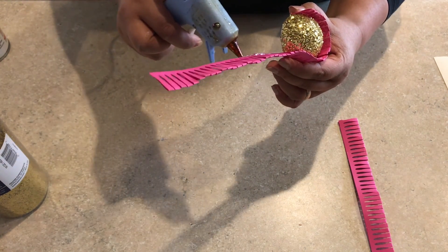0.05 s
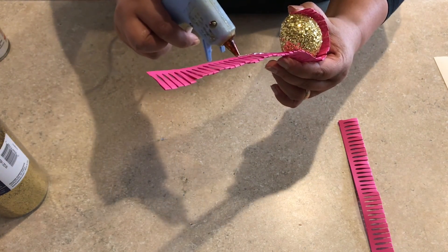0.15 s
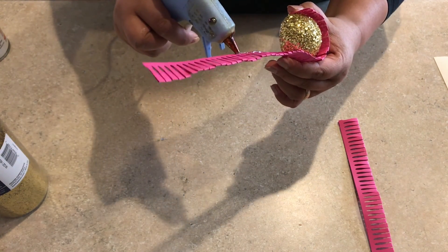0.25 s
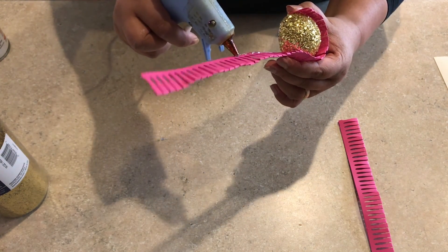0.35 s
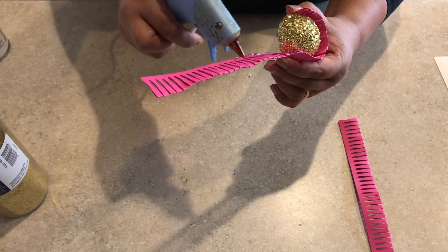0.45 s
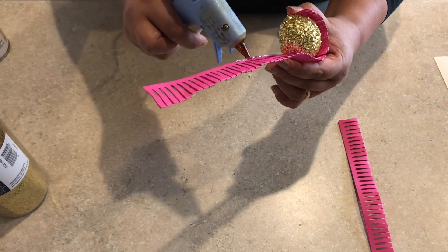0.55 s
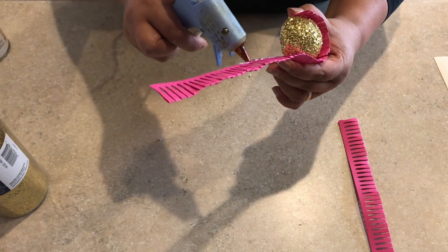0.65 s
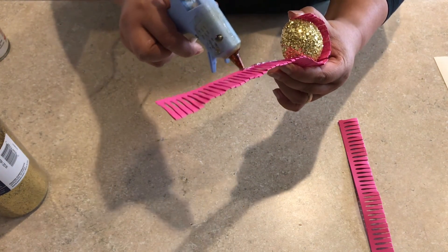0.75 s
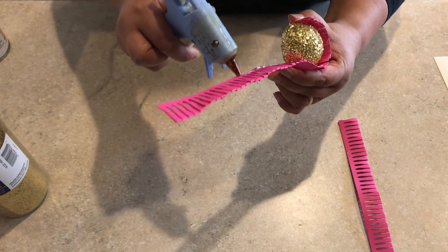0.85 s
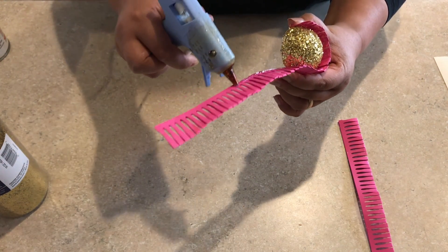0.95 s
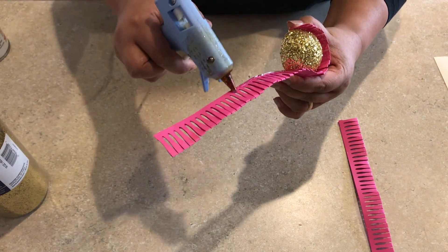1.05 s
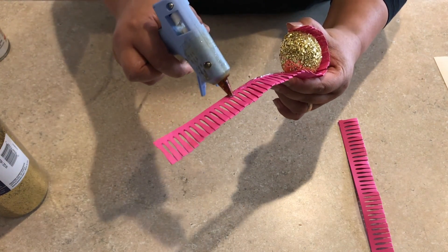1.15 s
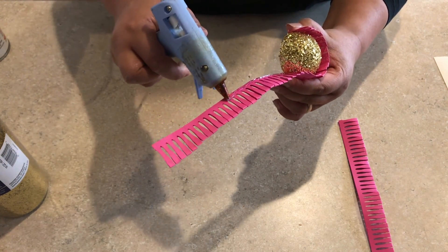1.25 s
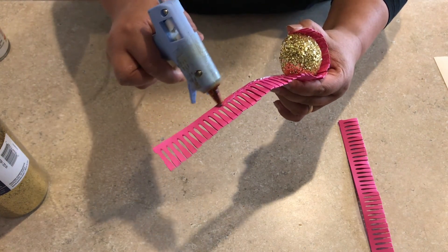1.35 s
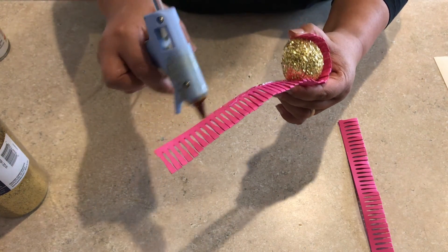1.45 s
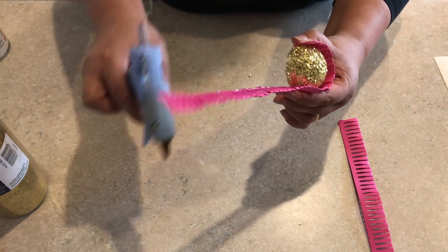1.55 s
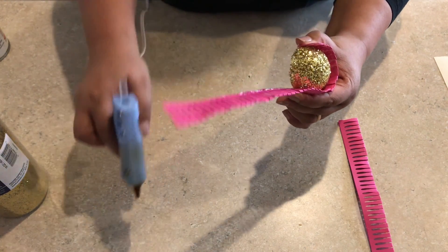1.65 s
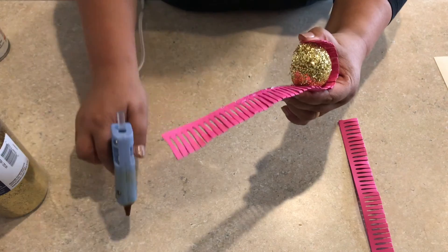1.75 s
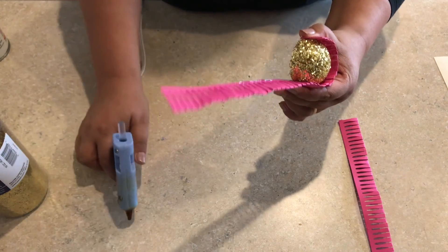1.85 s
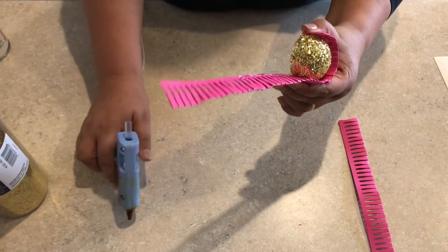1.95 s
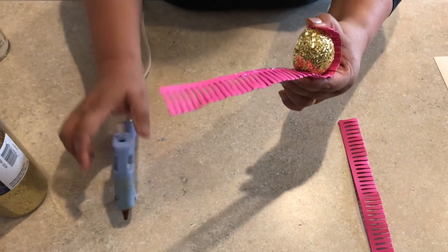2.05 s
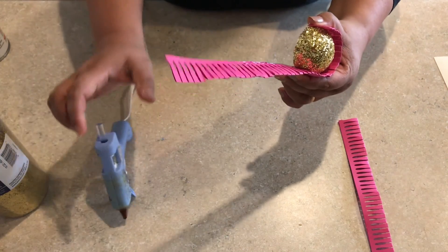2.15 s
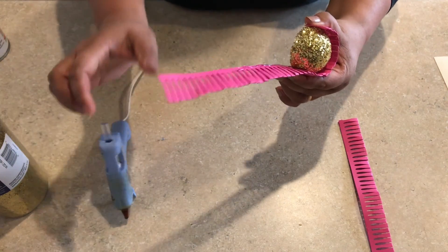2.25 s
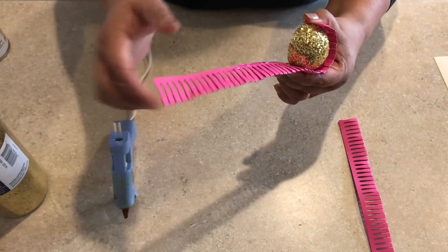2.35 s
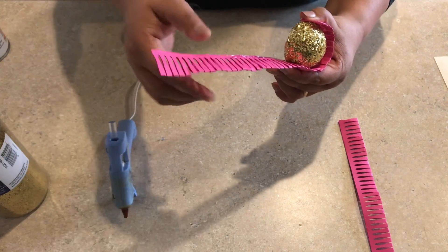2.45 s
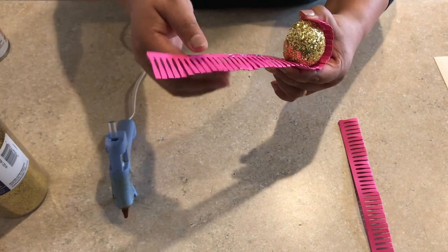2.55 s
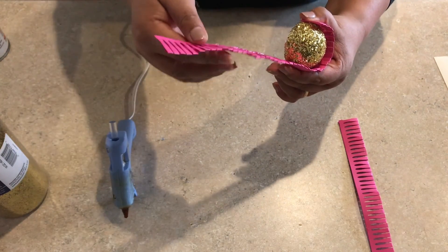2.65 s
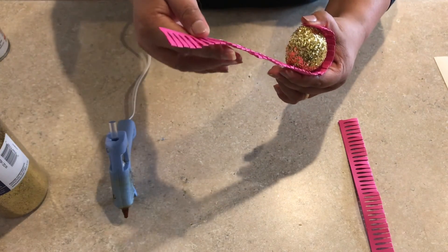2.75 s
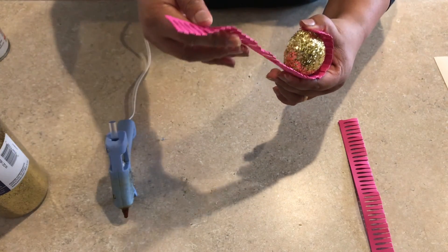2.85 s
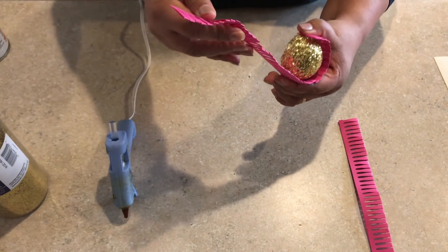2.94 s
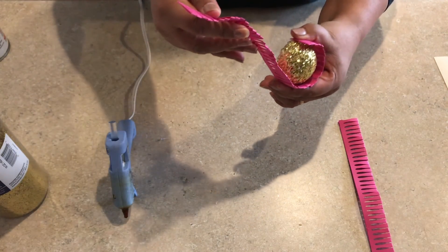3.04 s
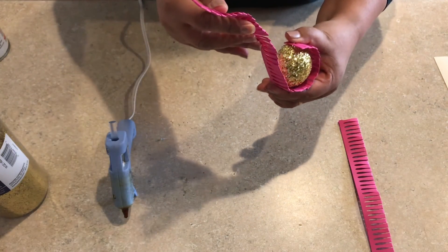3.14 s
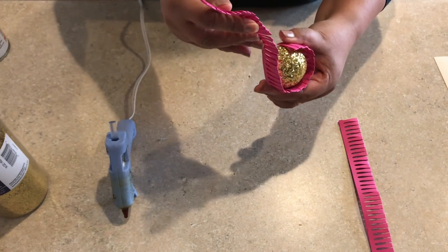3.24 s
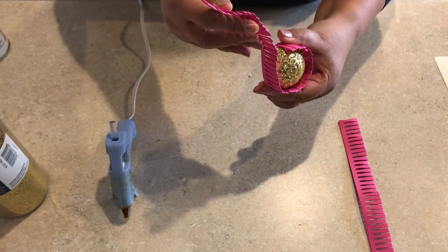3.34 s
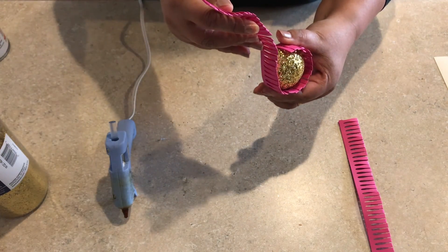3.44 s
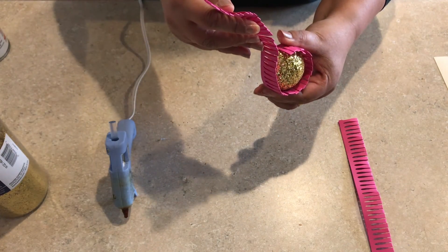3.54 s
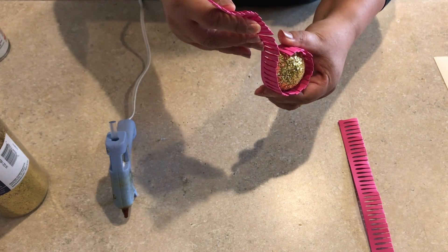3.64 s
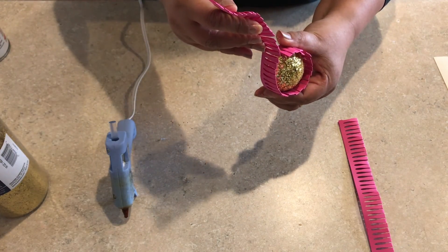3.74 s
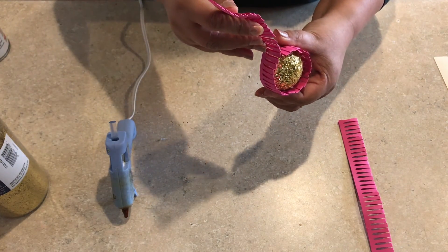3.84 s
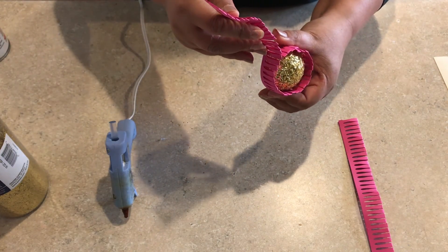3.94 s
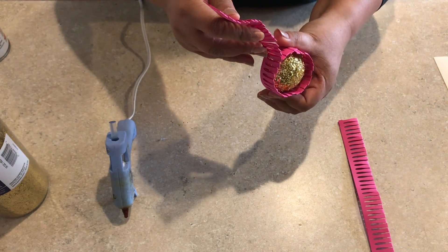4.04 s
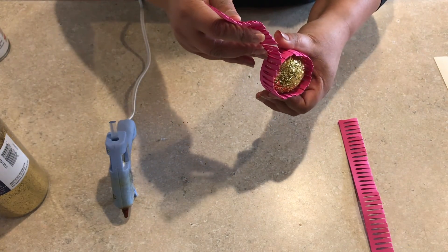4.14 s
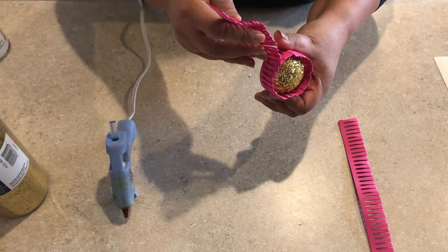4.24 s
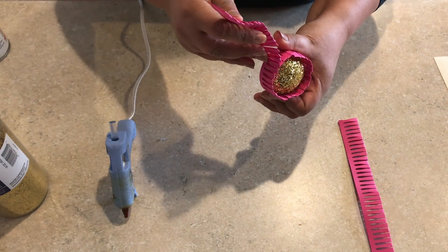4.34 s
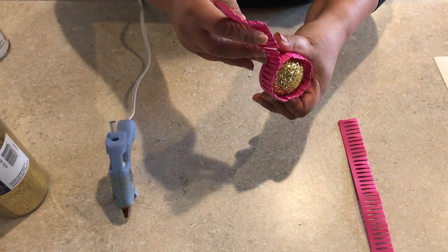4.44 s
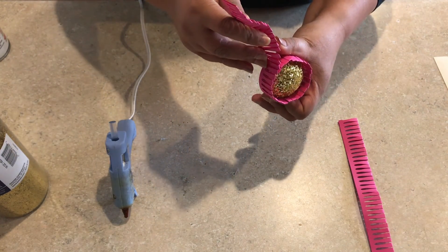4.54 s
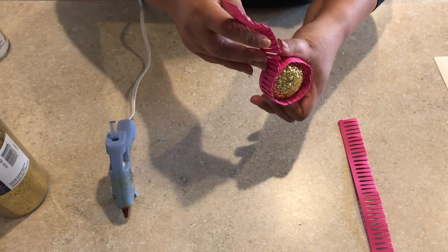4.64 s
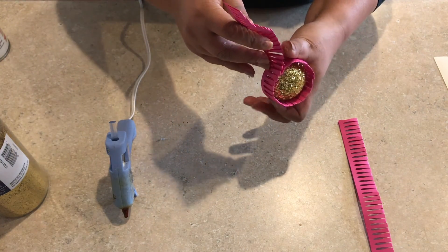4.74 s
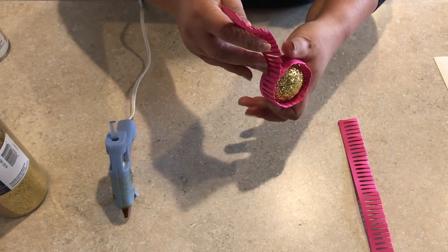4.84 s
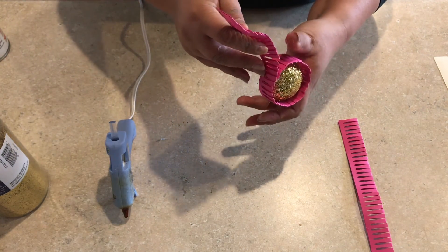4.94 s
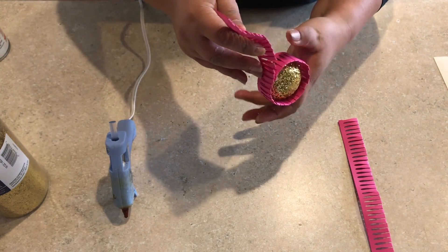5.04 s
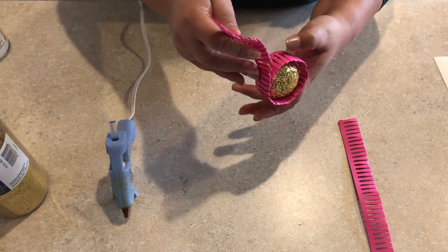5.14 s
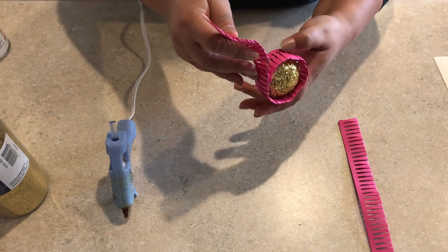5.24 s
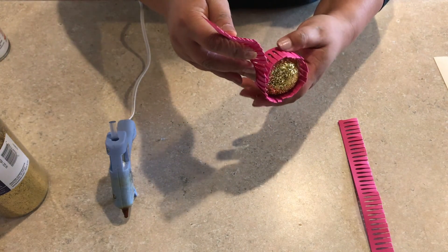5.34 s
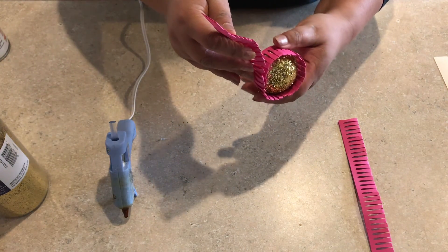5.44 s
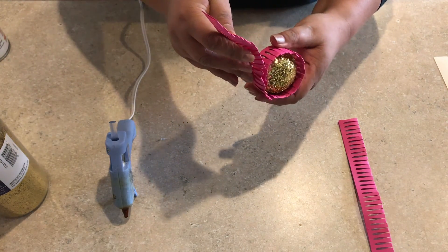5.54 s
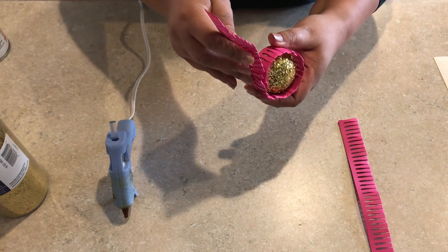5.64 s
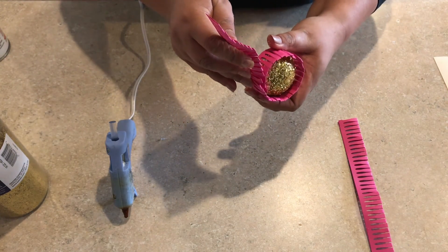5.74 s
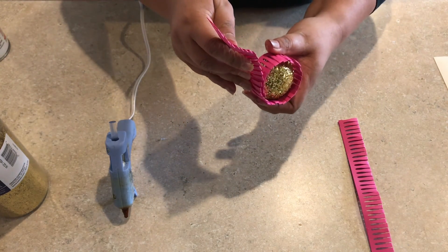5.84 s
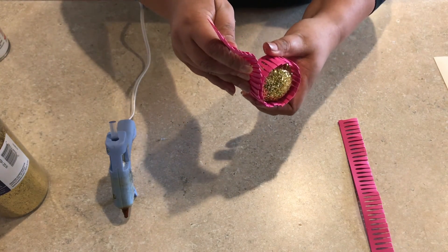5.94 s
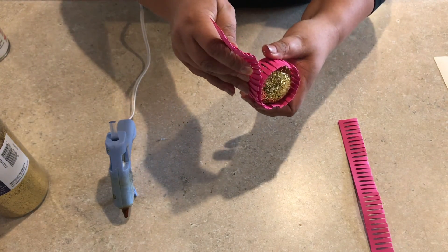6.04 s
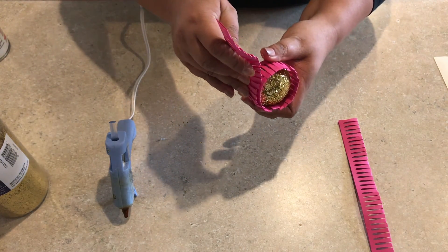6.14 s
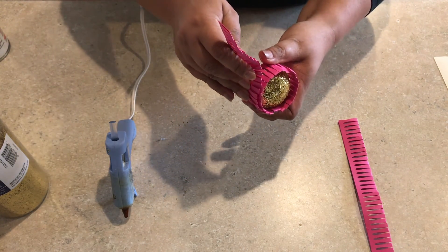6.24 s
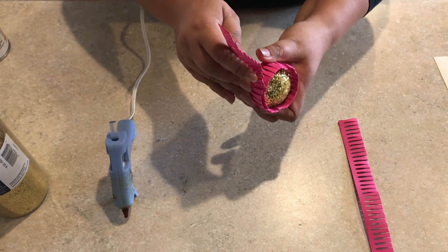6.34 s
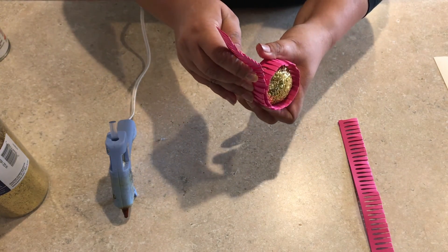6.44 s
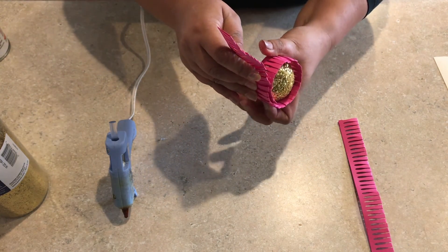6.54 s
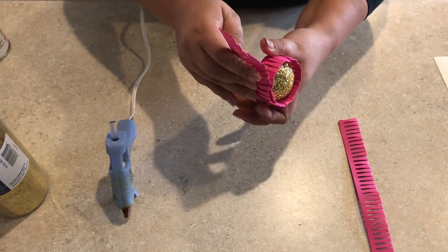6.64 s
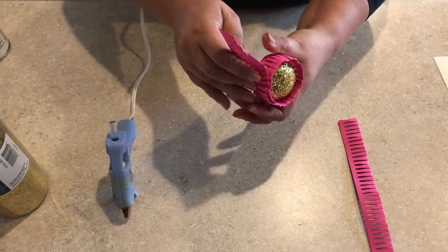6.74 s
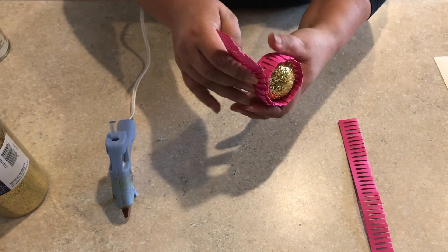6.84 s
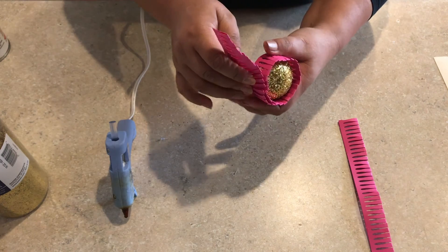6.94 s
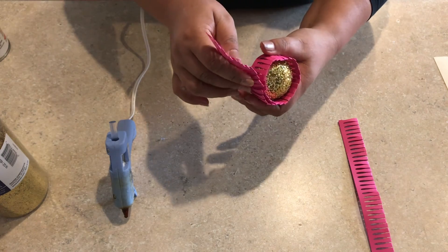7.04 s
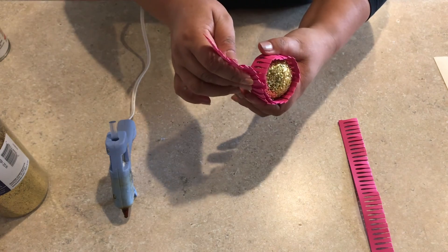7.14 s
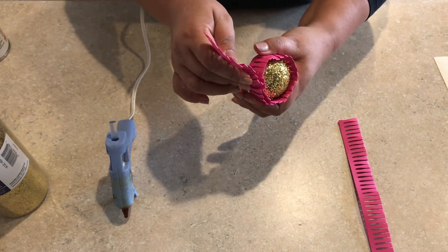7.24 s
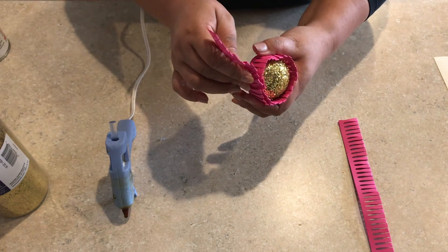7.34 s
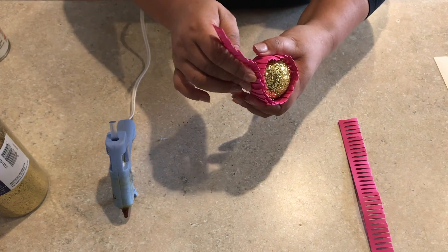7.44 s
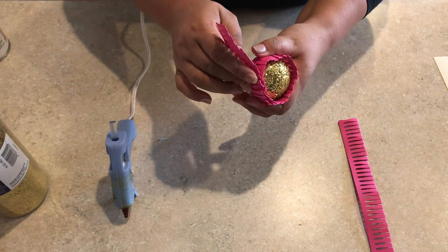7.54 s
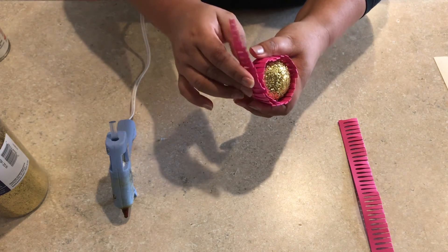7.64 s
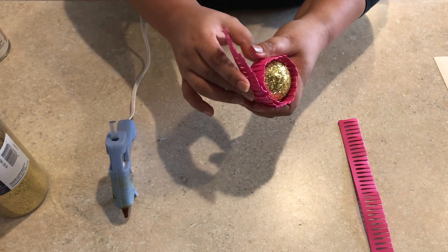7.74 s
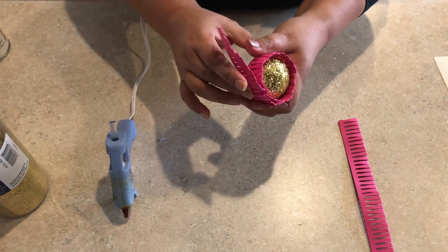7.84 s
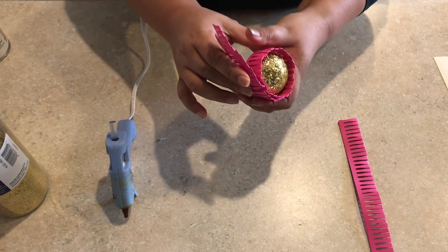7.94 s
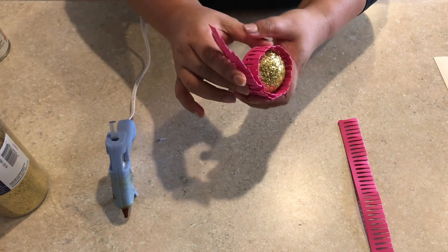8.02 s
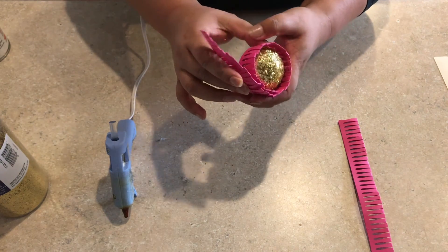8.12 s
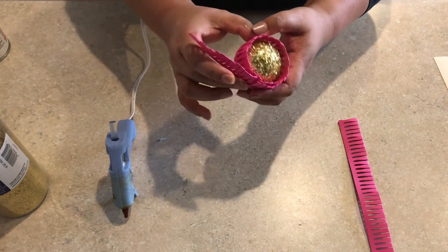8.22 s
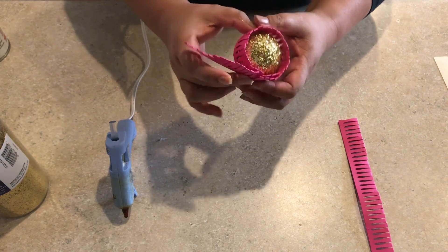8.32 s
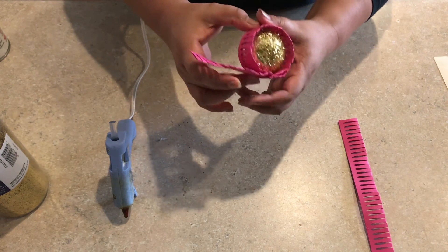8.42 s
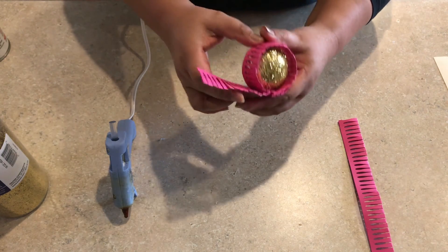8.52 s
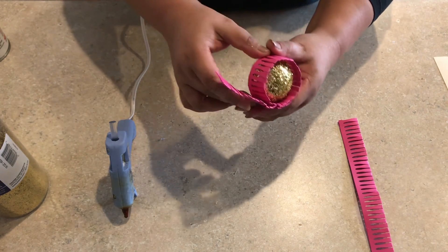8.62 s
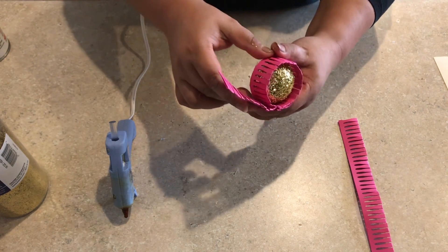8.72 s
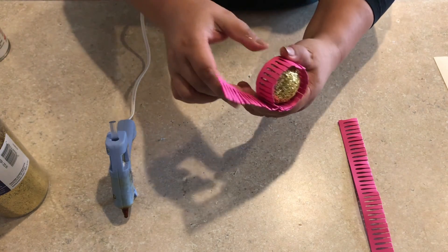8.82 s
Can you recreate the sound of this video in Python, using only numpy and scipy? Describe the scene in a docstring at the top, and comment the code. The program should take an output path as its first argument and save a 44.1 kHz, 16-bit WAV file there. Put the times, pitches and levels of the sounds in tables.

```python
"""In a quiet, hard-walled room lie a low rumble (filtered noise) and the regular swish of a distant appliance.
A small glue gun ticks as its stick slips (coloured bursts); it knocks and clicks faintly in handling, then lands
on a countertop and rocks to rest (decaying modes, cracks and chatter). A fringed strip of stiff paper is glued
and wound round a ball close by: it rubs (dense grains), crinkles and snaps (bursts that ring narrow resonances),
taps the ball dully and hisses while it is drawn tight (filtered noise)."""
import sys
import numpy as np
from scipy import signal
from scipy.fft import rfft, irfft, next_fast_len
from scipy.io import wavfile
from scipy.ndimage import uniform_filter1d

SR = 44100
rng = np.random.default_rng(int(sys.argv[2]) if len(sys.argv) > 2 else 0)


def wrap_up_sound(samples):
    """Save the sound to the file named by the first command line argument, as 16-bit audio."""
    columns = np.atleast_2d(samples).T
    # keep every value between -1 and 1, then stretch to whole-number steps
    tamed = np.clip(columns, -1, 1)
    steps = np.round(tamed * 32767).astype(np.int16)
    wavfile.write(sys.argv[1], SR, steps)


N = 391608  # length in samples
TOP_HZ = 16000  # upper limit of the sound's band
SWISH_S, TURN_S = 1.185, 1.299  # the appliance: first full swish, time of one turn
CREEP_END_S = 1.1  # the trigger is let go and the glue stick stops creeping
SPOT_DB, SPOT_DETUNE = 2, .006  # spread of mode level (dB) and pitch (share) with the point of contact
RING_CARRY_DB = -8  # narrow rings are heard close by and carry little into the room

# Spectrum of the room's background: hz, level_db
ROOM_TONE_SPECTRUM = [(20, -19), (40, -5), (80, 1), (108, -5.5), (135, -2.5), (270, -12.5), (340, -8.5),
                      (520, -20), (1100, -18), (1300, -21), (1580, -21), (2200, -28.5), (4000, -32.5),
                      (7500, -37), (16000, -38.5)]
# Reverberation time of the room: hz, t60_s
ROOM_DECAY = [(100, 0.47), (340, 0.58), (700, .48), (1500, 0.44), (3000, 0.29), (7000, 0.3), (16000, 0.15)]
# Spectrum of the room's echo: hz, level_db
ECHO_SPECTRUM = [(80, -12), (300, 0), (1200, -4.5), (2500, -1.5), (6000, -5.5), (16000, -6.5)]
# Slips of the glue stick: start_s, level_db (before the common gain)
STICK_SLIPS = [(0.0265, -47), (0.0896, -49), (0.1131, -52), (0.1274, -61), (0.192, -52), (0.2384, -52),
               (0.3067, -63), (0.3147, -50.5), (0.4584, -45), (0.4622, -42), (0.4984, -56), (0.5065, -45),
               (0.5422, -52), (0.5921, -52), (0.6115, -59), (0.6323, -51), (0.6634, -53), (0.754, -50),
               (0.7588, -40.5), (0.8088, -53), (0.816, -45.5), (0.863, -61.5), (0.9048, -47), (0.9283, -52),
               (0.9632, -59), (0.9986, -57), (1.0745, -57), (1.2326, -52.5), (1.348, -52), (1.3948, -52),
               (1.4015, -52), (1.4217, -47)]
# Spectrum of a slip: hz, level_db
SLIP_SPECTRUM = [(800, -31), (2500, 7.5), (4500, 4), (6100, 11.5), (7500, 3), (13000, 4.5), (16000, -13)]
# Knocks of the gun, in the hand, then on the counter: start_s, level_db, contact_cutoff_hz,
# thump_db, slap_db, chatter_db, boom_db (the last four relative to the knock)
GUN_KNOCKS = [(0.8723, -27.5, 1590, -8, -38, 6.5, -43), (1.9532, 3.5, 6800, 2.5, -16.5, -8, -47),
              (1.9592, -15.5, 3514, -18, -28, 16.5, -43), (2.157, -29.5, 2500, 7, -37, 11.5, -11.5),
              (2.2165, -15.5, 1520, 8, -45, 3, -41), (2.405, -24.5, 3320, 16.5, -39, 6, -23),
              (2.411, -23, 2600, 9, -34, -10, -35), (2.421, -17, 1090, -14, -38, 0, -28),
              (2.462, -27, 1200, 4, -35, 7.5, -25), (2.537, -34, 1070, 16.5, -33, -17, -23),
              (2.594, -26, 1590, 9, -42, 0.5, -26), (2.655, -45, 700, 18.5, -27.5, -10.5, -15),
              (2.688, -39.5, 1500, 16.5, -33, 1, -28), (2.695, -41.5, 2000, 4, -32, -1, -33),
              (2.734, -46, 600, 16.5, -28, -3, -19), (2.757, -43, 1217, 15.5, -35, -2, -22),
              (2.811, -41, 900, 4.5, -29.5, 11, -38)]
# Modes of gun and counter, before the shift by the point of contact: pitch_hz, level_db, t60_s
GUN_COUNTER_MODES = [(87.5, -11.5, 0.087), (133, -7, 0.086), (165, -4.5, 0.12), (200, -1.5, 0.057),
                     (250, -1, 0.056), (333, 1.5, 0.065), (462, -6.5, 0.12), (643, -1.5, 0.059),
                     (790, -8.5, 0.03), (893, 0.5, 0.065), (1086.7, -10.5, .04), (1328, -0.5, 0.043),
                     (1630, -3.5, 0.016), (1609, -2.5, 0.035), (1806, -4, 0.051), (1960, -2, 0.029),
                     (2110, -4.5, 0.027), (2420, -8, 0.044), (3776, -1.5, 0.019), (6400, -17.5, 0.015)]
# Spectrum of the crack of the plastic shell: hz, level_db
CRACK_SPECTRUM = [(50, -20.5), (200, -16), (650, -0.5), (1100, 8), (1500, -13), (2100, 2.5), (3000, -2),
                  (4800, -7.5), (7000, -5.5), (9000, -11), (16000, 6.5)]
# Spectrum of loose parts chattering inside the shell: hz, level_db
CHATTER_SPECTRUM = [(100, -6.5), (330, -3.5), (600, 10), (1000, 9), (1500, 7), (2100, 5), (3000, -3.5),
                    (6000, -8), (16000, -14)]
# The two low resonances woken by the knocks: pitch_hz, level_db, t60_s
LOW_RESONANCES = [(327.5, -1, 0.65), (348, -0.5, 0.42)]
# Rubs of paper on paper and skin: start_s, length_s, level_db, rasp_centre_hz
PAPER_RUBS = [(1.374, 0.4, -79, 5040), (2.123, 0.041, -71, 6500), (2.69, 0.063, -72, 13200),
              (4.768, 0.12, -59.5, 6300), (4.892, 0.068, -64.5, 6000), (6.375, 0.073, -73, 7400),
              (6.585, 0.059, -72.5, 4800), (6.823, 0.086, -72.5, 5500), (6.974, 0.041, -72, 6000),
              (7.047, 0.15, -74, 4880), (7.571, 0.11, -72, 3180), (7.765, 0.053, -73, 8450),
              (7.915, 0.023, -68.5, 4750), (8.25, 0.085, -72.5, 13040), (8.45, 0.05, -71, 6100),
              (8.686, 0.049, -64.5, 5360), (8.715, 0.076, -75, 6000), (8.862, 0.028, -68, 5070)]
# Spectrum of paper fibres that catch and slip: hz, level_db
FIBRE_SPECTRUM = [(600, -24), (1600, -5.5), (3000, 0), (6200, -3.5), (9000, 0.5), (13500, -3), (16000, -8)]
# Spells of faint clicks and crinkles, handling of the gun, then the bending strip:
# start_s, length_s, level_db, body_db, edge_db (levels before the scatter and the common gains)
CLICK_CRINKLE_SPELLS = [(1.504, 0.23, -58, -14, -32), (5.972, 0.2, -59, -14, -15),
                        (6.597, 0.089, -63, -24.5, -2.5), (7.595, 0.12, -65, -17, -12),
                        (8.25, 0.091, -63.5, -19, -7.5), (8.7, 0.12, -68, -19, -12)]
# Snaps of single tabs, and before them faint clicks of the gun being handled:
# start_s, level_db, body_db, edge_db, ring_hz, ring_db (level, body and edge before the common gains)
CLICKS_AND_SNAPS = [(1.56, -52, -9, -31, 4730, 5.5), (1.581, -54.5, -2.5, -31, 2520, 1.5),
                    (1.686, -42, -17, -36, 4430, -12), (1.74, -57, -8.5, -21, 1470, 11),
                    (1.746, -64.5, 1, -24, 1370, 16), (1.7809, -30.5, -32.5, -6, 8200, -5),
                    (1.8735, -37, -24, -37, 5530, -16), (3.2603, -33.5, -11, -15.5, 4470, -1),
                    (3.5563, -45.5, -17.5, -1.5, 7100, -6), (3.563, -41, -23, 0.5, 6850, -7.5),
                    (3.5872, -33, -22.5, -9, 6720, -12), (3.6171, -32.5, -21.5, -5.5, 6720, -11),
                    (3.6714, -30.5, -25, -9, 8900, 0), (3.709, -32, -13.5, -5.5, 4360, -8),
                    (3.882, -51.5, -24, -1, 8860, -2), (4.122, -41, -23, -10, 9130, -12),
                    (4.1827, -28.5, -27.5, -7.5, 3900, 4), (4.404, -36, -20.5, -9, 6560, -11),
                    (4.7501, -28, -19, -18, 1500, 1.5), (4.786, -43, -17, -11, 3900, 1),
                    (4.7985, -33.5, -16.5, -9, 2200, 2), (4.932, -38, -27.5, -11.5, 6540, -18),
                    (5.1456, -54.5, -28.5, -9, 8000, -5), (5.439, -40, -25, -21, 8250, -7.5),
                    (5.518, -42.5, -27.5, -12.5, 6230, -10), (5.5721, -46, -19, -8, 9000, -4.5),
                    (5.737, -52.5, -16, -14.5, 4190, 7.5), (5.9466, -38.5, -30.5, 1.5, 8830, 6.5),
                    (5.995, -52.5, -14, -6, 2940, 4.5), (6.08, -57, -17, -21, 2810, 17),
                    (6.116, -40.5, -24, -8.5, 3160, 9.5), (6.1557, -46.5, -40, -14.5, 4500, 4),
                    (6.402, -45, -15, -6.5, 7700, -6.5), (6.636, -47, -27.5, -6.5, 6950, -11),
                    (6.689, -50, -8.5, -21, 4690, -6), (6.7097, -45, -20, -5, 8100, -10),
                    (6.7535, -37.5, -21, -7.5, 8040, 4), (6.858, -50, -18, -18, 6030, 1.5),
                    (7.047, -47, -35, -4, 12000, -3), (7.115, -60.5, -11.5, -22.5, 5240, 6.5),
                    (7.219, -60, -24, 2, 9000, -3), (7.257, -55, -28, -10.5, 8920, 0),
                    (7.2653, -43.5, -20, -4.5, 6200, -4.5), (7.28, -50, -25.5, -7, 9100, 0),
                    (7.319, -44, -26, -4, 8040, -2), (7.3276, -31, -26.5, -10, 3210, 10.5),
                    (7.346, -48, -32.5, 1, 9140, 8), (7.368, -57, -7, -14, 6000, 0),
                    (7.783, -49, -24.5, -9.5, 9100, 5.5), (7.794, -63, -25, -9.5, 9140, 1),
                    (8.0642, -57, -30, -13, 6030, 4.5), (8.287, -54.5, -21.5, -6, 4200, -1),
                    (8.427, -55, -27, -8.5, 9000, -0.5), (8.485, -52, -24, -10.5, 6100, 6),
                    (8.624, -48, -38.5, -3.5, 9000, -0.5), (8.646, -46, -21, -10.5, 5440, -12)]
# Modes of a click or snap: ratio (multiple of its ring pitch), level_db
CLICK_SNAP_MODES = [(1, 8.5), (1.37, -12), (1.95, -4), (2.7, -6)]
# Level of the hiss while the strip is drawn tight: time_s, level_db
HISS_ENVELOPE = [(4.17, -110), (4.19, -64), (4.581, -62.5), (4.60, -110)]
# Spectrum of that hiss: hz, level_db
HISS_SPECTRUM = [(100, 12.5), (300, 11), (700, 0), (2000, -2), (6000, -4.5), (10000, -6.5), (16000, -11.5)]


def undb(db):
    """Decibel law: level to amplitude ratio."""
    return 10 ** (np.asarray(db) / 20)


def unit(x):
    """Normalisation to an rms of 1."""
    return x / np.sqrt(np.mean(x ** 2))


def at(points, hz):
    """Interpolation of (hz, value) points on a logarithmic frequency axis."""
    f, v = np.transpose(points)
    return np.interp(np.log(np.maximum(hz, 1)), np.log(f), v)


def colour(x, points):
    """Minimum-phase filtering by a folded cepstrum, with the given (hz, level_db) response."""
    size = next_fast_len(2 * len(x))
    gain = undb(at(points, np.fft.rfftfreq(size, 1 / SR)))
    cepstrum = irfft(np.log(gain), size)
    cepstrum[1:size // 2] *= 2
    cepstrum[size // 2 + 1:] = 0
    response = np.exp(rfft(cepstrum))
    return irfft(rfft(x, size) * response, size)[:len(x)]


def lowpass(x, hz, order=2):
    """Butterworth low-pass: a gentle loss of treble."""
    return signal.sosfilt(signal.butter(order, min(hz, SR / 2 - 1), fs=SR, output="sos"), x)


def resonate(x, hz, width_hz):
    """A single resonance, with gain 1 at its centre."""
    return signal.lfilter(*signal.iirpeak(hz, hz / width_hz, fs=SR), x)


def fade(t, t60):
    """Exponential decay that loses 60 dB in t60 seconds."""
    return np.exp(-np.log(1000) * t / t60)


def burst(t60, size=2048):
    """Impulsive excitation: a dying cluster of tiny impulses, with unit energy."""
    x = np.sign(rng.standard_normal(size)) * fade(np.arange(size) / SR, t60)
    return x / np.linalg.norm(x)


def rattle(t60, rate, size=2048):
    """Repeated contact: a dying train of separate, uneven impulses, with unit energy."""
    contacts = rng.random(size) < rate / SR
    x = rng.standard_normal(size) * contacts * fade(np.arange(size) / SR, t60)
    return x / (np.linalg.norm(x) + np.finfo(float).eps)


def walk(rate):
    """Slow random modulation: chance levels, rate per second, smoothed twice."""
    k = int(SR / rate)
    levels = np.repeat(rng.standard_normal(N // k + 1), k)
    return unit(uniform_filter1d(uniform_filter1d(levels, k), k)[:N])


def add(out, s, x):
    """Superposition of x on out from time s, row by row."""
    i = max(int(s * SR), 0)
    out[..., i:i + x.shape[-1]] += x[..., :max(N - i, 0)]


def room(x, onset_s=0.0022):
    """Diffuse reverberation from hard walls: noise bands, each decaying at its own rate."""
    size = SR // 2
    t, hz = np.arange(size) / SR, np.fft.rfftfreq(size, 1 / SR)
    noise = rfft(rng.standard_normal(size))
    edges = np.geomspace(40, SR / 2, 14)
    tail = np.zeros(size)
    for lo, hi in zip(edges, edges[1:]):
        band = irfft(noise * ((hz >= lo) & (hz < hi)), size)
        tail += band * fade(t, at(ROOM_DECAY, np.sqrt(lo * hi)))
    tail = colour(tail * (1 - np.exp(-(t / onset_s) ** 2)), ECHO_SPECTRUM)
    return signal.fftconvolve(x, tail / np.linalg.norm(tail))[:len(x)]


def room_tone(db=-62, split_hz=1200, flicker_db=0.5, rumble_db=.5, swell_db=1.26, lag_s=0.83,
              drone_hz=260, drone_width_hz=220, drone_swell_db=1.5):
    """Amplitude modulation: a rumble swells once a turn, most in its low drone, under a steady faint hiss."""
    turn = np.cos(2 * np.pi * (np.arange(N) / SR - SWISH_S - lag_s) / TURN_S)
    air = unit(colour(rng.standard_normal(N), ROOM_TONE_SPECTRUM))
    air = air + (undb(drone_swell_db * turn) - 1) * resonate(air, drone_hz, drone_width_hz)
    rumble = lowpass(air, split_hz, order=1)
    rumble_gain = undb(rumble_db + swell_db * turn + flicker_db * walk(14))
    return undb(db) * (air + rumble * (rumble_gain - 1))


def stray_fibres(rate=14, db=-55):
    """Isolated stick-slip: single fibres tick at random moments all the while the paper is held."""
    out = np.zeros(N)
    for when, size in rng.random((int(rate * N / SR), 2)):
        add(out, when * N / SR, undb(db) * size ** 2 * colour(burst(.008), FIBRE_SPECTRUM))
    return out


def feed_ticks(gain_db=2, t60=0.016, ring_db=-6, ring_t60=0.021,
               creep_db=-57, creep_spread_db=10, count=60):
    """Stick-slip friction: the glue stick jerks with sharp ticks and creeps with a fine crackle."""
    out = np.zeros(N)
    creeps = []
    for when, size in rng.random((count, 2)):
        creeps.append((CREEP_END_S * when, creep_db - creep_spread_db * size))
    for s, db in list(STICK_SLIPS) + creeps:
        tick = burst(t60) + undb(ring_db) * burst(ring_t60)
        add(out, s, undb(db + gain_db) * colour(tick, SLIP_SPECTRUM))
    return out


def slap(t, hz=1520, rise_s=0.0012):
    """Heavily damped oscillation: the hollow side of the gun swings a few times as it lands."""
    swell = (t / rise_s) ** 2 * np.exp(2 * (1 - t / rise_s))
    return swell * np.sin(2 * np.pi * hz * t)


def gun_ring(t):
    """Modal superposition: each point of contact favours and shifts other modes."""
    spot, bend = rng.standard_normal((2, len(GUN_COUNTER_MODES)))
    ring = np.zeros(len(t))
    for k, (hz, db, t60) in enumerate(GUN_COUNTER_MODES):
        gain = (-1) ** k * undb(db + SPOT_DB * spot[k])
        ring += gain * np.sin(2 * np.pi * hz * (1 + SPOT_DETUNE * bend[k]) * t) * fade(t, t60)
    return ring


def gun_knocks(ring_db=-25, crack_db=5, crack_t60=0.016, chatter_t60=0.075, thump_hz=300,
               give_s=0.00096, leak_db=-17, edge_hz=6500, wet_db=-8.5, crack_carry_db=-8.0):
    """Impact: a softer contact leaves mostly the low modes; each knock has its own smooth echo."""
    out, t = np.zeros(N), np.arange(SR // 2) / SR
    give = 1 - np.exp(-t / give_s)  # the shell yields for a moment before it takes the load
    far_crack = colour(signal.unit_impulse(len(t)), CRACK_SPECTRUM)
    far_chatter = colour(signal.unit_impulse(len(t)), CHATTER_SPECTRUM)
    for s, db, contact_hz, thump_db, slap_db, chatter_db, _ in GUN_KNOCKS:
        crack = colour(burst(crack_t60, size=len(t)), CRACK_SPECTRUM)
        chatter = colour(rattle(chatter_t60, rate=2300, size=len(t)), CHATTER_SPECTRUM)
        tone = undb(slap_db) * slap(t) + give * undb(ring_db) * gun_ring(t)
        close = tone + give * (undb(crack_db) * crack + undb(chatter_db) * chatter)
        far = undb(RING_CARRY_DB) * tone
        far = far + undb(crack_db + crack_carry_db) * far_crack + undb(chatter_db) * far_chatter
        blow = close + undb(wet_db) * room(far)
        blow = blow + (undb(thump_db) - 1) * lowpass(blow, thump_hz, order=1)
        # a little of the treble leaks past the soft contact
        blow = lowpass(blow, contact_hz) + undb(leak_db) * lowpass(blow, edge_hz)
        add(out, s, undb(db) * blow)
    return out


def boom(build_s=0.01):
    """Beating: the knocks wake two close, low resonances that interfere as they die away."""
    out, t = np.zeros(N), np.arange(SR) / SR
    ring = sum(undb(db) * np.sin(2 * np.pi * hz * t) * fade(t, t60) for hz, db, t60 in LOW_RESONANCES)
    ring = (1 - np.exp(-t / build_s)) * ring
    for s, db, *_, boom_db in GUN_KNOCKS:
        add(out, s, undb(db + boom_db) * ring)
    return out


def appliance(hz=1115, width_hz=250, swish_s=0.047, db=-65.0, fall_db_per_s=0.5, uneven_db=1.7):
    """Periodic noise through one resonance: a swish each turn, every other one weaker, slowly fading."""
    t = np.arange(N) / SR
    off = (t - SWISH_S + TURN_S / 2) % TURN_S - TURN_S / 2  # time from the nearest swish
    tone = unit(resonate(lowpass(rng.standard_normal(N), 1800), hz, width_hz))
    alternation = np.cos(np.pi * (t - SWISH_S) / TURN_S)
    level = undb(db - fall_db_per_s * t + uneven_db * alternation)
    return tone * np.exp(-.5 * (off / swish_s) ** 2) * level


def paper_rubs(grain_db=1.5, grain_rate=3000, rasp_db=2, rasp_width_hz=1400, catch_db=3.0):
    """Friction noise: fibres catch and slip in dense grains, and each rub has its own rasp."""
    out = np.zeros(N)
    sizes = rng.standard_normal(N) * undb(grain_db * np.minimum(rng.exponential(size=N), 4))
    slips = sizes * (rng.random(N) < grain_rate / SR)
    grains = colour(slips, FIBRE_SPECTRUM) * undb(catch_db * walk(90))
    for s, length, db, hz in PAPER_RUBS:
        rub = grains[int(s * SR):int((s + length) * SR)]
        rub = unit(rub + undb(rasp_db) * resonate(rub, hz, rasp_width_hz))
        add(out, s, undb(db) * rub * signal.windows.tukey(len(rub), .5))
    return out


def click_or_snap(db, body_db, edge_db, ring_hz, ring_db, gain_db=6.0, tick_t60=0.004, tick_db=-1,
                  snap_t60=0.01, flutter_t60=0.062, flutter_db=-7, flutter_hz=5000, body_gain_db=17,
                  edge_gain_db=11, ring_width_hz=380, crackle_t60=0.083, crackle_db=-8):
    """Impulse-excited resonance: a sharp tick rings narrow modes, with a dying flutter and crackle:
    rows (close by, into the room)."""
    body, edge = body_db + body_gain_db, edge_db + edge_gain_db
    spectrum = [(200, body - 11), (900, body - 9), (1500, body + 1), (3200, body - 1),
                (6000, 0), (8500, 0.0088), (13000, edge), (16000, edge - 1)]  # hz, level_db
    snap = undb(tick_db) * burst(tick_t60) + burst(snap_t60)
    snap = snap + undb(crackle_db) * rattle(crackle_t60, rate=1000)
    flutter = undb(flutter_db) * lowpass(rattle(flutter_t60, rate=1500), flutter_hz, order=1)
    ring = sum(undb(mode_db) * resonate(snap, ring_hz * ratio, ring_width_hz)
               for ratio, mode_db in CLICK_SNAP_MODES if ring_hz * ratio < TOP_HZ)
    rows = []
    for carry_db in (0, RING_CARRY_DB):
        rows.append(colour(snap + undb(ring_db + carry_db) * ring + flutter, spectrum))
    return undb(db + gain_db) * np.array(rows)


def clicks_and_crinkles(scatter_db=7, low_hz=2700, high_hz=6500, ring_db=6, count=7):
    """Successive random impulses: spells of faint clicks of the handled gun, then crinkles of the
    bending strip: rows (close by, into the room)."""
    out = np.zeros((2, N))
    for s, length, db, body_db, edge_db in CLICK_CRINKLE_SPELLS:
        for k, (when, size, pitch) in enumerate(rng.random(size=(count, 3))):
            level_db = db + scatter_db * (size - .5)
            ring_hz = low_hz + pitch * (high_hz - low_hz)
            snap = click_or_snap(level_db, body_db, edge_db, ring_hz, ring_db)
            add(out, s + length * (k + when) / count, snap)
    return out


def clicks_and_snaps():
    """Sudden release: faint clicks of the gun being handled, then clear snaps of single paper tabs:
    rows (close by, into the room)."""
    out = np.zeros((2, N))
    for s, *snap in CLICKS_AND_SNAPS:
        add(out, s, click_or_snap(*snap))
    return out


def ball_tap(s=3.2603, db=-21, hz=600, width_hz=800, t60=0.024):
    """Damped impact: the strip comes taut against the ball with a dull tap."""
    out = np.zeros(N)
    tap = resonate(resonate(burst(t60), hz, width_hz), hz, width_hz)
    add(out, s, undb(db) * tap)
    return out


def hiss():
    """Broadband friction noise: an even hiss of the tight strip that stops abruptly."""
    level_db = np.interp(np.arange(N) / SR, *np.transpose(HISS_ENVELOPE))
    return unit(colour(rng.standard_normal(N), HISS_SPECTRUM)) * undb(level_db)


def scene(handling_wet_db=-10):
    """Superposition of direct sound, echo and the background of the room."""
    # glue ticks, fibres, rubs and the tap feed both rows alike
    both = feed_ticks() + stray_fibres() + paper_rubs() + ball_tap()
    close, far = clicks_and_crinkles() + clicks_and_snaps() + both
    handling = close + undb(handling_wet_db) * room(far)
    return (room_tone() + gun_knocks() + boom() + appliance() + handling + hiss())[None]


def record(dry):
    """Linear filtering of the tone: one treble band is lifted, a low and a high band are hollowed,
    and the top is cut."""
    for hz, width_hz, db in [(384, 76, -6.0), (6095, 280, 1.5), (10400, 630, -2.5)]:
        dry = dry + (undb(db) - 1) * resonate(dry, hz, width_hz)
    return signal.sosfilt(signal.ellip(10, .2, 70, TOP_HZ, fs=SR, output="sos"), dry)


dry = scene()
out = record(dry)
wrap_up_sound(out)
```